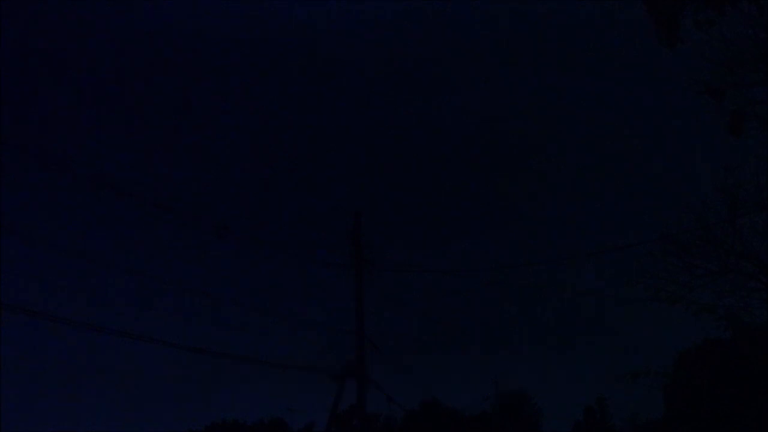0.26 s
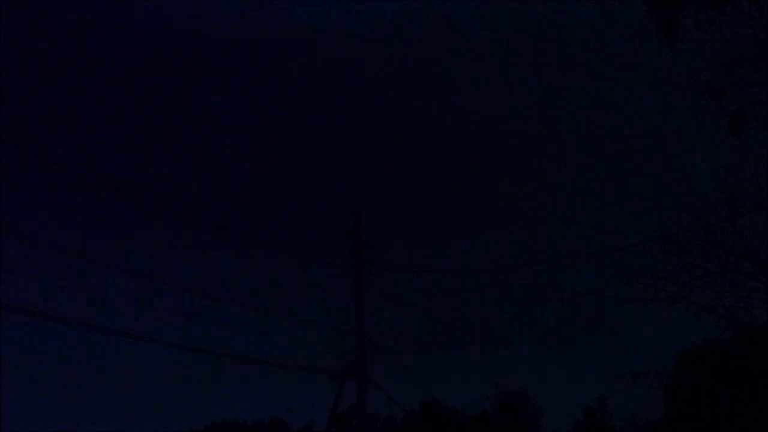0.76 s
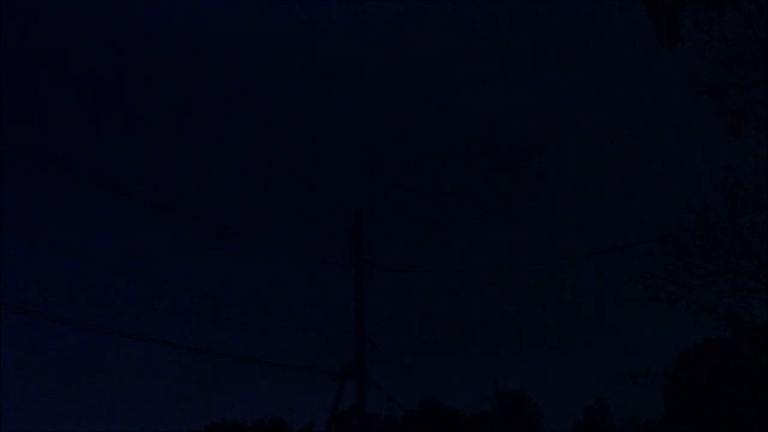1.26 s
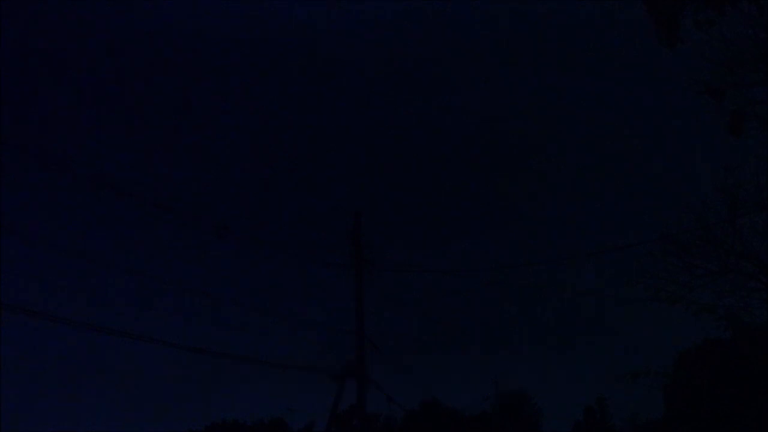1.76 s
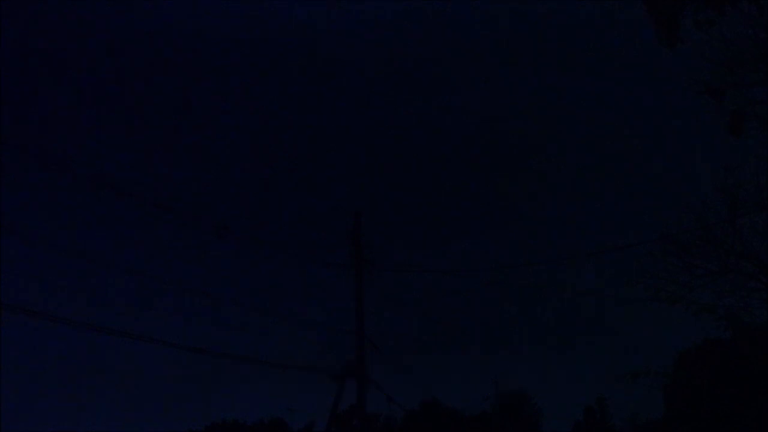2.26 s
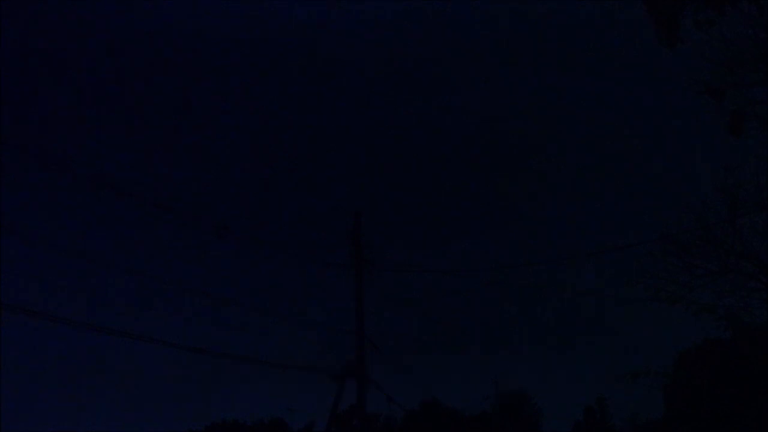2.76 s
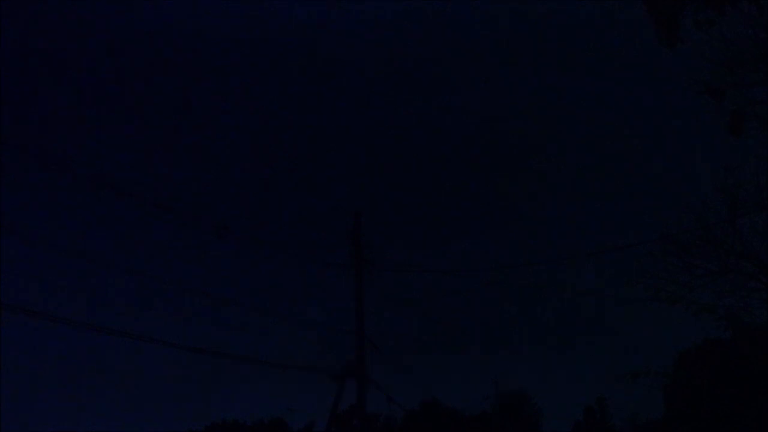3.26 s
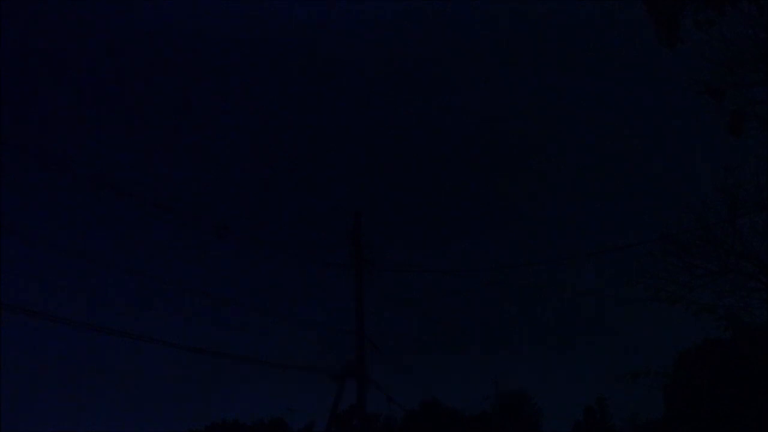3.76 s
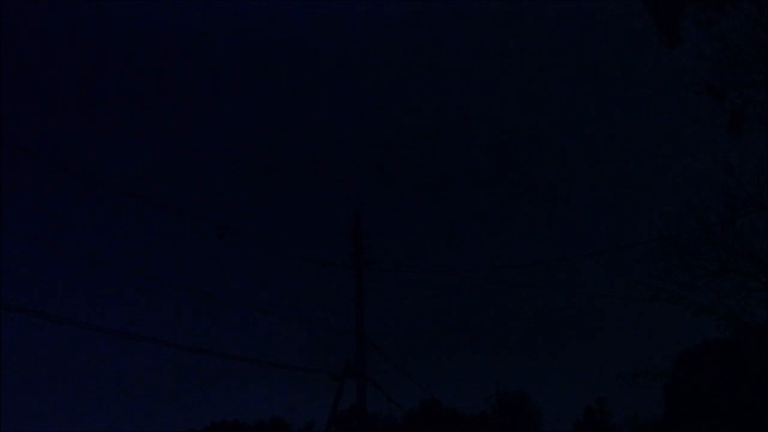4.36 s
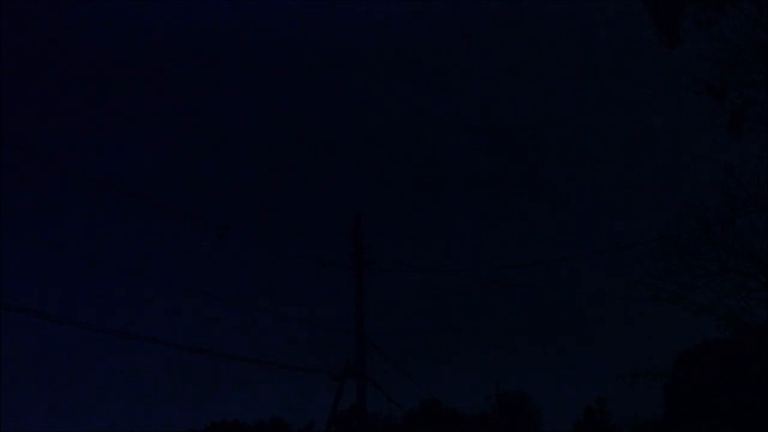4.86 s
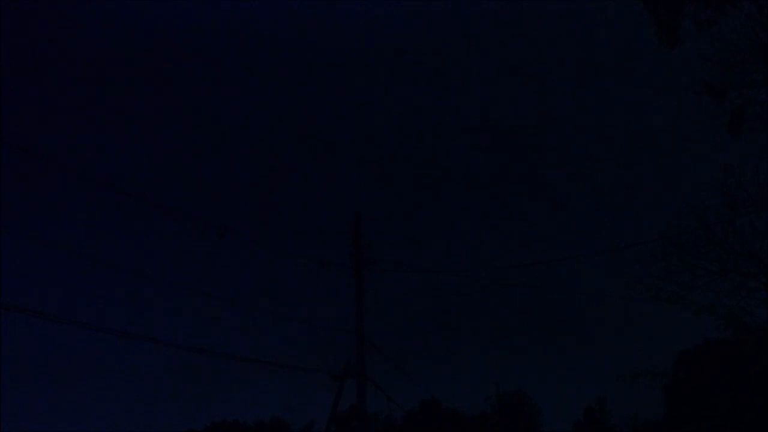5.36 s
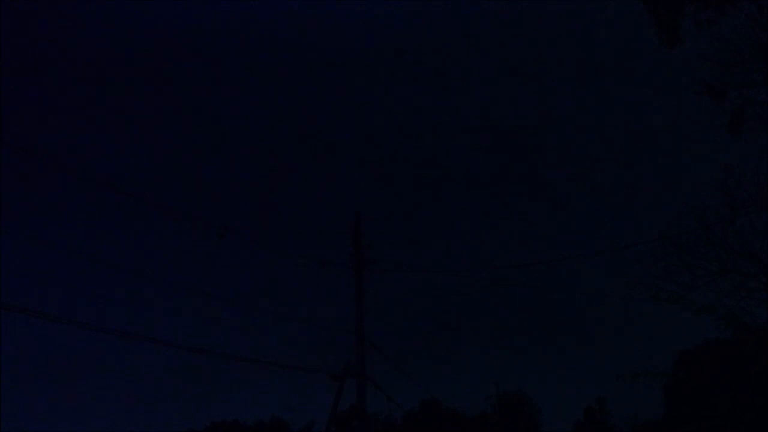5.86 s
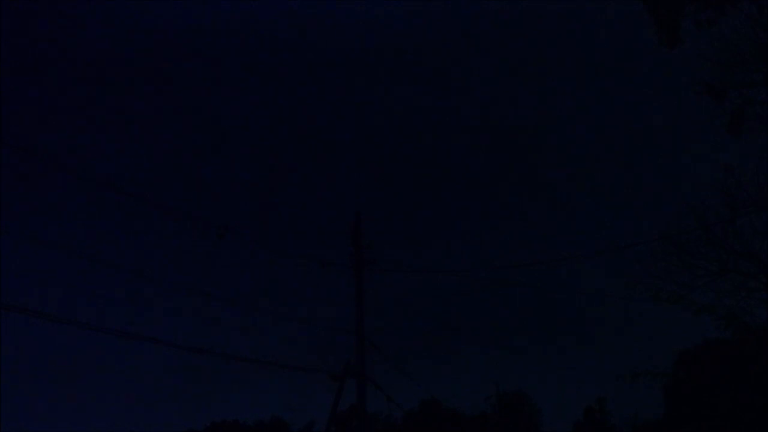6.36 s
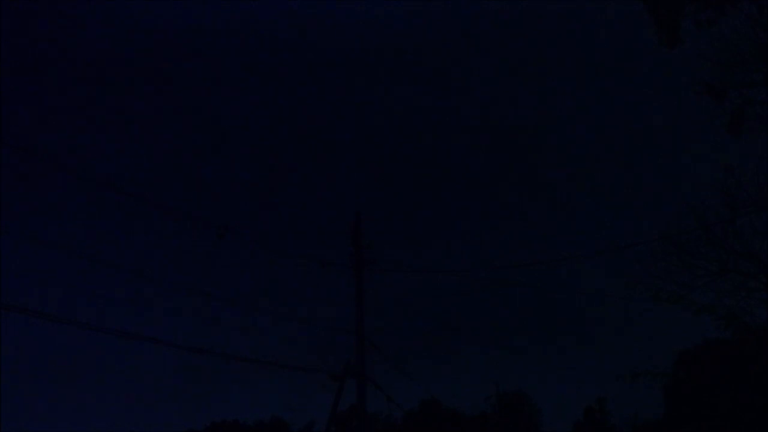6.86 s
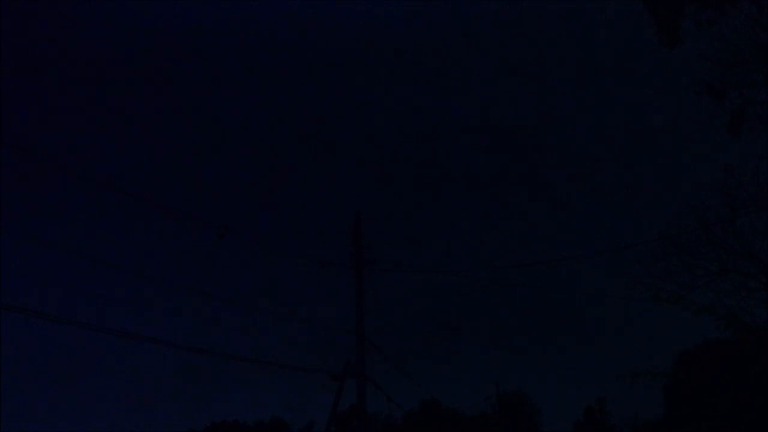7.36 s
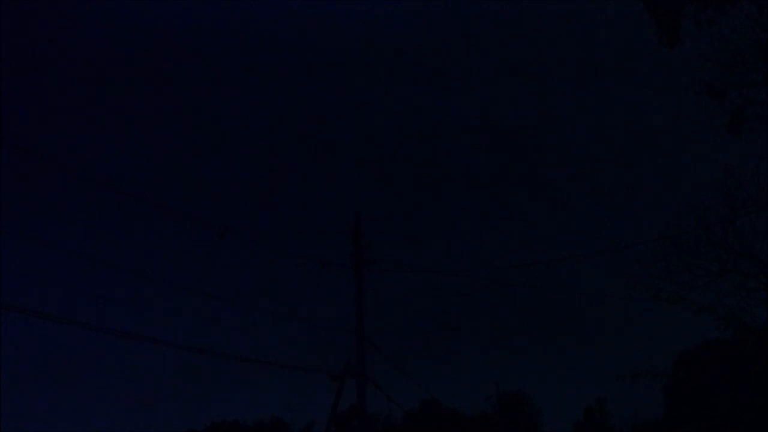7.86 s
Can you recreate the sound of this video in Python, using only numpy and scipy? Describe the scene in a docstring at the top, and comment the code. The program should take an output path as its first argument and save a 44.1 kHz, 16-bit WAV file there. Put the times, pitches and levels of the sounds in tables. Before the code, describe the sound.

Quiet evening air with light handling rustle and far rumbling, broken by a loud, blunt burst of thunder that echoes off into deep mutters.

```python
"""Close thunder outdoors. From the start a far rumble of filtered clicks mutters, with rounded thuds, sine swings
that swell and die; soft scuffs, swishes and spells of rustling, all made of friction grains, sound nearby,
with three faint high whistles of narrow noise early on, over the faint grainy hiss of the open air.
After about 3.6 s a clap breaks: overlapping peals of scattered clicks, topped by single shock fronts, overload
the microphone. From about 5 s it rolls away in echoes, and more thuds follow from about 6 s to the end."""
import sys
import numpy as np
from scipy import signal
from scipy.fft import rfft, irfft
from scipy.io import wavfile
from scipy.ndimage import uniform_filter1d, minimum_filter1d

SR = 44100
rng = np.random.default_rng(int(sys.argv[2]) if len(sys.argv) > 2 else 0)


def output_pcm(signal):
    """Save a mono or channel-first signal as 16-bit PCM at the path in sys.argv[1].

    Samples are clipped to [-1, 1] before scaling.
    """
    pcm = np.clip(np.atleast_2d(signal).T, -1, 1) * 32767
    wavfile.write(sys.argv[1], SR, np.round(pcm).astype(np.int16))


N = 357651
TIME, HZ = np.arange(N) / SR, np.fft.rfftfreq(N, 1 / SR)  # seconds, Hz
BOOM_HZ, CRACKLE_HZ = 170, 450  # the boom lies below the first, the crackle above the second

# Tone of a shock after its way through the air. Each row: frequency in Hz, gain in dB.
SHOCK_TONE = [(20, -39), (35, -26.5), (52, -17.5), (85, -12.5), (130, -4), (175, -3), (212, 1.5), (300, -1),
              (400, -8.5), (560, -16), (880, -21), (1130, -33.5), (1550, -48.5), (2600, -80.5)]
# Rounded thuds in the far rumble. Each row: start in seconds, nominal peak in dB, pitch in Hz,
# hold in seconds of the grumble behind it.
FAR_THUDS = [(0.371, -32, 109, 0.05), (0.504, -20, 176, 0.043), (0.65, -28, 141, 0.035),
             (0.802, -25, 158, 0.15), (0.92, -26, 198, 0.11), (1.175, -23.5, 301, 0.041),
             (1.499, -30.5, 215.6, 0.008), (1.644, -26.5, 136, 0.025), (1.745, -26.5, 257, 0.097),
             (1.912, -24, 237, 0.045), (3.423, -23, 220, 0.042), (6.21, -23, 176, 0.018),
             (6.299, -25, 156, 0.008), (6.439, -24, 163, 0.05), (6.64, -21, 167, 0.013),
             (7.057, -19, 186, 0.022), (7.19, -15.5, 170.4, 0.023), (7.329, -20.5, 193, 0.078),
             (7.407, -16, 231.5, 0.0097), (7.999, -27.5, 192, 0.064)]


def roll(lumps_db=1.6, boom_lumps_db=1.6, crackle_lumps_db=0.8):
    """Shocks from all along the crooked channel overlap; near stretches crackle, far ones boom."""
    # Peals, one for each stretch of the lightning channel. Each row: start in seconds, rise in seconds,
    # hold in seconds, nominal body level in dB, boom in dB relative to the body,
    # crackle in dB relative to the body, fade in dB per second.
    peals = [(3.584, 0.0048, 0.12, -14.5, -8, -15, 17), (3.632, 0.0085, 0.017, -7.5, -6, -13.5, 291),
             (3.7, 0.0055, 0.04, -10, -5, -11.5, 39), (4.183, 0.05, 0.08, -12.5, -6.5, -6.5, 113),
             (4.337, 0.024, 0.18, -15, -4, -8.5, 98), (4.724, 0.032, 0.25, -22.5, 4.5, -10, 87),
             (4.968, 0.067, 0.11, -13.3, -12, -7, 49)]
    power = far_power() + sum(peal_power(*row) for row in peals)
    boom_rms, body_rms, crackle_rms = np.sqrt(power)

    scattered = patchy(clicks(per_s=1600, spread_db=2.0), depth_db=2.5, size=2048)
    scattered = coloured(scattered, SHOCK_TONE)
    # the single fronts take their share of the peal's power from the scattered ones,
    # weighed against the loudest moment around them
    crest = -minimum_filter1d(-body_rms, size=700)
    arrivals = rfft(steadied(scattered, size=2600) + shocks() / crest)

    # air swallows the treble first, so boom, body and crackle swell by different amounts
    deep = 1 / (1 + (HZ / BOOM_HZ) ** 8)
    sharp = 1 - 1 / (1 + (HZ / CRACKLE_HZ) ** 8)
    boom = steadied(irfft(arrivals * deep, N), size=2200) * boom_rms
    boom = boom * gain_of(boom_lumps_db * lumps(size=2600))
    body = steadied(irfft(arrivals * (1 - deep - sharp), N), size=1400) * body_rms
    crackle = steadied(irfft(arrivals * sharp, N), size=1400) * crackle_rms
    crackle = crackle * gain_of(crackle_lumps_db * lumps(size=2000))

    # faint, far thunder has crossed more turbulent air and comes in lumps (in full at -32 dB)
    farness = np.clip(-20 * np.log10(body_rms) / 32, 0, 1)
    return (boom + body) * gain_of(lumps_db * farness * lumps(size=2000)) + crackle


def shocks():
    """Stretches of the channel that lie broadside arrive all at once, as single pressure fronts."""
    # Each row: time in seconds, peak in dB before the fronts join the peals.
    front_rows = [(3.582, -8), (3.618, -11.5), (3.642, -2), (3.649, -2), (3.716, -0.5), (3.729, 2.5),
                  (3.742, 0.5), (3.767, -1.5), (3.843, -9), (3.896, -2), (4.226, -2.5), (4.258, -2),
                  (4.434, -7), (5.027, -9.5)]
    fronts = np.zeros(N)
    for s, db in front_rows:
        fronts[round(s * SR)] = gain_of(db)
    one_front = coloured(1. * (TIME == 0), SHOCK_TONE)
    return coloured(fronts, SHOCK_TONE) / abs(one_front).max()


def peal_power(s, rise, hold, db, boom_db, crackle_db, fade_db):
    """A peal swells, holds and fades while the land throws it back: power of boom, body and crackle."""
    # echo levels of boom, body and crackle relative to the peal's body, if the peal holds for echo_hold_s
    echo_db, echo_hold_s = (-8, -12.5, -20.5), .1
    echo_rise_s, echo_fade_db_per_s = 0.49, 13.5
    age = np.maximum(TIME - s, 0)
    direct = np.minimum(age / rise, 1) * gain_of(-fade_db * np.maximum(age - rise - hold, 0))
    echo = np.minimum(age / echo_rise_s, 1) * gain_of(-echo_fade_db_per_s * age)
    direct_power = np.outer(gain_of([db + boom_db, db, db + crackle_db]), direct) ** 2
    # a longer peal sends back more energy
    echo_power = np.outer(gain_of(db) * gain_of(echo_db), echo) ** 2 * abs(hold) / echo_hold_s
    return direct_power + echo_power


def far_power():
    """The far rumble, with a short grumble behind each thud; the lower the thud, the more it booms."""
    # Each row: time in seconds, nominal body level in dB, nominal crackle level in dB.
    rumble = [(0.0, -40, -42), (1.1, -36, -43.5), (2.1, -35.5, -42), (2.85, -39, -52.5), (3.4, -32.5, -44),
              (6.3, -32, -46.5), (7.35, -30, -49), (7.7, -35.5, -50), (8.11, -35.5, -61)]
    boom_db = -4  # relative to the body
    grumble_db, grumble_rise_s, grumble_fall_s = -6, 0.0067, 0.014  # level relative to the thud's peak
    times, *columns = np.transpose(rumble)
    body_db, crackle_db = (np.interp(TIME, times, column) for column in columns)
    power = gain_of([body_db + boom_db, body_db, crackle_db]) ** 2
    for s, db, hz, hold in FAR_THUDS:
        deep = 1 / (1 + (hz / BOOM_HZ) ** 4)
        grumble = gain_of(db + grumble_db) * stroke(s, hold, grumble_rise_s, grumble_fall_s)
        power[:2] += np.outer([deep, 1 - deep], grumble ** 2)
    return power


def thuds(swell_s=0.015):
    """Distance strips a shock of its edge and leaves a few low, rounded swings."""
    out = np.zeros(N)
    for s, db, hz, _ in FAR_THUDS:
        age = np.maximum(TIME - s, 0)
        swell = age / swell_s * np.exp(1 - age / swell_s)
        out += gain_of(db) * swell * np.sin(2 * np.pi * hz * age)
    return out


def scuffs():
    """Each scuff is a first contact, then a short run of gritty grains over a duller scrape."""
    # Scuffs close by. Each row: start in seconds, hold in seconds, nominal grit level in dB,
    # dull body in dB relative to the grit.
    scuff_rows = [(0.025, 0.018, -40.5, -2), (0.297, 0.061, -53, 13), (0.941, 0.071, -47, 5.5),
                  (2.025, 0.065, -52, 16), (2.51, 0.03, -49, 4), (2.638, 0.017, -44.5, 7.5),
                  (2.802, 0.025, -50, -15), (4.155, 0.045, -50.5, -10), (4.923, 0.11, -46, 9),
                  (5.652, 0.017, -46.5, 6), (5.804, 0.018, -46.5, -3), (5.977, 0.04, -55, 12),
                  (6.365, 0.016, -48.5, 11), (6.398, 0.056, -41, 5.5), (6.728, 0.04, -36, 6),
                  (6.763, 0.064, -46, 16), (6.897, 0.66, -50.5, -8), (6.93, 0.085, -54, 15),
                  (7.444, 0.028, -50, -13)]
    # Tones of grit and body. Each row: frequency in Hz, relative gain in dB.
    grit_tone = [(900, -42), (1300, -7), (1800, -4.5), (2300, 2), (2550, -2), (2850, 3.5), (3300, -6),
                 (4500, -13), (8000, -30)]
    body_tone = [(150, -8.5), (350, 0), (550, 3.5), (720, 4.5), (1020, -0.5), (1300, -8.5), (2200, -42.5)]
    grit, body = np.zeros((2, N))
    for s, hold, db, body_db in scuff_rows:
        contact = stroke(s, 0, rise=.0005, fall=.005)
        rub = gain_of(db) * (contact + stroke(s, hold, rise=0.0015, fall=0.022))
        grit += rub
        body += rub * gain_of(body_db)
    grit = grit * grains(grit_tone, per_s=5000, spread_db=2.5, patchy_db=3)
    body = body * grains(body_tone, per_s=2500, spread_db=2.5, patchy_db=2.2)
    return grit + body


def swishes():
    """Light rubs of fine, high grain set in at once, hold for half their length and die."""
    # Each row: start in seconds, length in seconds, nominal level in dB.
    swish_rows = [(0.041, 0.046, -48), (0.417, 0.14, -46.5), (0.828, 0.04, -47), (0.958, 0.11, -49),
                  (1.413, 0.083, -46), (2.037, 0.067, -52), (2.542, 0.05, -49), (3.589, 0.14, -48.5),
                  (3.762, 0.045, -40), (4.044, 0.075, -47.5), (4.171, 0.096, -46.5), (4.342, 0.057, -42.5),
                  (4.8, 0.044, -43), (4.941, 0.095, -43), (6.222, 0.06, -49.5), (6.754, 0.05, -38.5),
                  (6.916, 0.05, -48.5), (7.188, 0.04, -42)]
    # Tone of the grain. Each row: frequency in Hz, relative gain in dB.
    tone = [(1200, -20), (2400, -0.5), (3200, -1.5), (4200, 1), (5500, -4), (6700, -5.5), (8500, -13),
            (11500, -16), (14000, -21.5)]
    rubs = sum(gain_of(db) * stroke(s, length / 2, rise=0.0029, fall=0.029)
               for s, length, db in swish_rows)
    return rubs * grains(tone, per_s=7000, spread_db=4.0, patchy_db=4.5)


def rustle(flutter_db=1.07, settle_s=0.072):
    """A bed of fine grains that swells in spells, stirred by small jerks that settle again."""
    # Spells of rustling. Each row: start in seconds, hold in seconds, nominal level in dB.
    spell_rows = [(0, 1.6, -54.5), (3.154, 0.21, -51.5), (4.95, 0.18, -45.5), (5.69, 0.26, -53.5),
                  (6.76, 0.72, -45.5), (7.796, .3, -46)]
    # Tone of the grain. Each row: frequency in Hz, relative gain in dB.
    tone = [(500, 5.5), (1200, -1), (1750, -12), (2350, 4.5), (2550, -4.5), (2900, 7), (3400, 1.5),
            (5000, 1), (6800, -1), (8500, -7), (11500, -7), (14000, -14.5)]
    rest_db, rise_s, fall_s = -54, 0.034, 0.29  # the bed between spells; the ends of a spell
    settle = np.exp(-1 / (settle_s * SR))
    jerks = signal.lfilter([1], [1, -settle], abs(clicks(per_s=27, spread_db=6.5)))
    flutter = gain_of(flutter_db * evened(jerks - jerks.mean()))
    spells = sum((gain_of(db) * stroke(s, hold, rise_s, fall_s)) ** 2 for s, hold, db in spell_rows)
    level = np.sqrt(gain_of(rest_db) ** 2 + spells) * flutter
    return level * grains(tone, per_s=6000, spread_db=0.5, patchy_db=1.54)


def chirps(hz=10750, width_hz=170):
    """Faint, fuzzy whistles high in the treble: short strokes of narrow-band noise."""
    # Each row: start in seconds, nominal level in dB.
    chirp_rows = [(.045, -50), (.66, -59), (1.08, -63)]
    band = 1 / (1 + ((HZ - hz) / width_hz) ** 2)
    whistle = irfft(rfft(rng.standard_normal((2, N))) * band, N)
    level = sum(gain_of(db) * stroke(s, 0.044, rise=0.0042, fall=0.014) for s, db in chirp_rows)
    return evened(whistle) * level


def air():
    """The smooth hiss of the open air, a very dense bed of grains."""
    # Tone of the hiss. Each row: frequency in Hz, relative gain in dB.
    tone = [(100, -9), (800, 13.5), (1300, 8), (1750, 1.5), (2350, 6.5), (3300, -1), (5000, -2),
            (8500, -38), (12000, -28), (14000, -28.5)]
    return gain_of(-48.5) * grains(tone, per_s=20000, spread_db=2, patchy_db=1.5)


def grains(colour, per_s, spread_db, patchy_db):
    """Dense friction grains at rms 1, alike at the two ports in the bass and less so in the treble."""
    # How alike the two microphone ports hear near sounds. Each row: frequency in Hz, likeness from 0 to 1.
    likeness = [(300, 0.93), (2500, 0.77), (4500, 0.32), (8000, 0.46), (13000, 0)]
    shared, left, right = (rfft(evened(clicks(per_s, spread_db))) for _ in range(3))
    same = np.clip(read(likeness, HZ), 0, 1)
    ports = irfft(np.sqrt(same) * shared + np.sqrt(1 - same) * np.array([left, right]), N)
    return evened(coloured(patchy(ports, patchy_db, size=256), colour))


def clicks(per_s, spread_db):
    """Random clicks of either sign, many small and a few large."""
    size = gain_of(spread_db * np.minimum(rng.exponential(1, N), 4))
    return size * rng.choice([-1., 1.], N) * (rng.random(N) < per_s / SR)


def stroke(s, hold, rise, fall):
    """Envelope of one rub: it sets in, holds while the surfaces slide, and dies (all in seconds)."""
    age = np.maximum(TIME - s, 0)
    return (1 - np.exp(-age / rise)) * np.exp(-np.maximum(age - hold, 0) / fall)


def patchy(x, depth_db, size):
    """Random patches of the spectrum come and go, so the tone keeps shifting a little."""
    z = signal.stft(x, nperseg=size)[2]
    patches = uniform_filter1d(rng.standard_normal(z.shape[-2:]), size=3, axis=0)  # over frequency
    patches = evened(uniform_filter1d(patches, size=3 + 2048 // size, axis=1))  # over time
    return signal.istft(z * gain_of(depth_db * patches), nperseg=size)[1][..., :N]


def coloured(x, points):
    """Filter with the given spectrum; its phase lets the ringing build up to each click."""
    log_gain = np.log(gain_of(read(points, abs(np.fft.fftfreq(N, 1 / SR)))))
    return irfft(rfft(x) * np.exp(signal.hilbert(log_gain))[:len(HZ)], N)


def steadied(x, size):
    """Takes the slow swells out of a random sound, leaving its grain near rms 1."""
    power = uniform_filter1d(uniform_filter1d(x ** 2, size), size)
    return x / np.sqrt(abs(power) + 1e-20)


def lumps(size):
    """A slow random wobble at rms 1."""
    return evened(uniform_filter1d(uniform_filter1d(rng.standard_normal(N), size), size))


def evened(x):
    """Scales to rms 1."""
    return x / np.sqrt(np.mean(x ** 2) + 1e-20)


def read(points, hz):
    """Reads a spectrum table on a log-frequency axis."""
    f, value = np.transpose(points)
    return np.interp(np.log(hz + 1), np.log(f + 1), value)


def gain_of(db):
    """Decibels to amplitude."""
    return 10 ** (np.asarray(db) / 20)


def hollow(x, hz=2830, width_hz=330):
    """A narrow band of the upper midrange comes twice, which gives near sounds a hollow ring."""
    band = np.exp(-((HZ - hz) / width_hz) ** 4)
    echo = np.exp(-2j * np.pi * HZ * .01543)  # a delay of 15.43 ms
    return irfft(rfft(x) * (1 + band * echo) / np.sqrt(1 + band ** 2), N)


def scene(low_cut_hz=8):
    """The thunder reaches both ports nearly alike; near sounds are wider."""
    thunder = rfft(roll() + thuds())
    left = thunder * np.exp(-2j * np.pi * HZ * 2e-5)  # 20 microseconds later
    right = thunder * 1j * HZ / (1j * HZ + low_cut_hz)
    # the pairs below are left and right gains in dB
    sky = irfft(np.array([left, right]), N) * gain_of([[.25], [-.25]])
    near = scuffs() * gain_of([[1.1], [-1.1]]) + (swishes() + rustle()) * gain_of([[-.5], [.5]])
    return sky + hollow(near + air()) + chirps()


def record(dry):
    """The loudest fronts overload the microphone and get rounded tops; then the band limit."""
    clipped = dry / (1 + dry ** 12) ** (1 / 12)
    low_pass = signal.firwin(511, 14350, window=("kaiser", 9), fs=SR)  # edge in Hz
    return signal.oaconvolve(clipped, low_pass[None], "same")


dry = scene()
out = record(dry)
output_pcm(out)
```